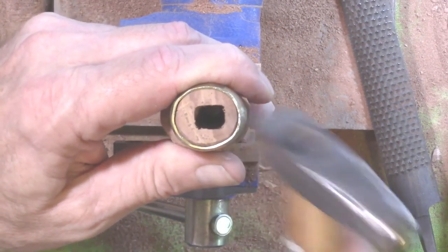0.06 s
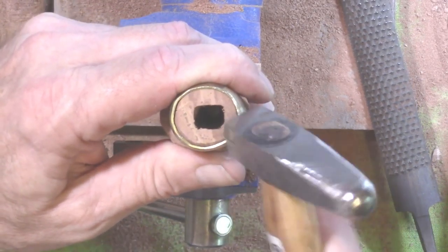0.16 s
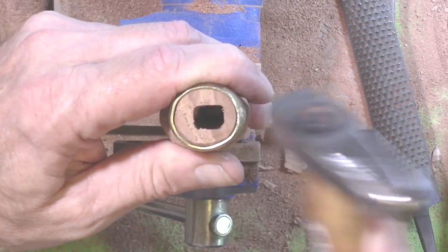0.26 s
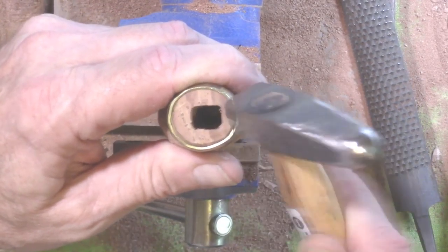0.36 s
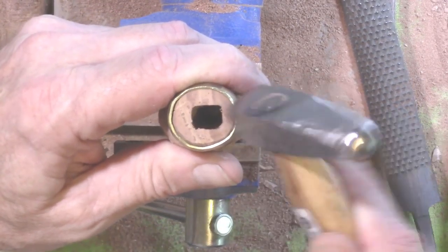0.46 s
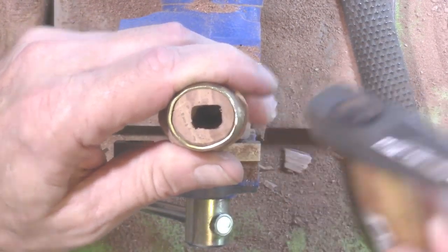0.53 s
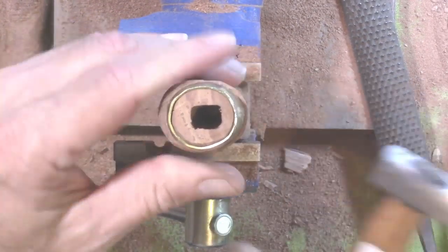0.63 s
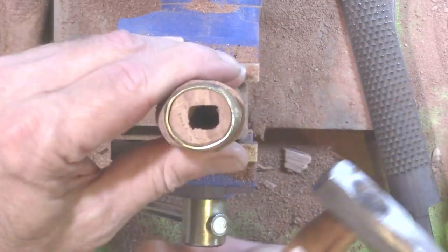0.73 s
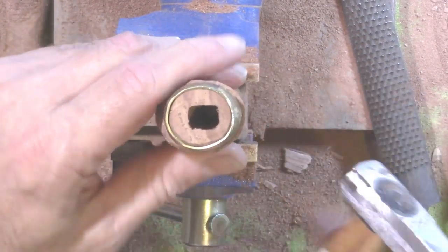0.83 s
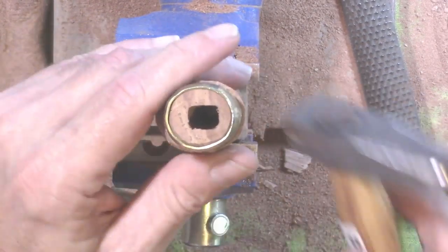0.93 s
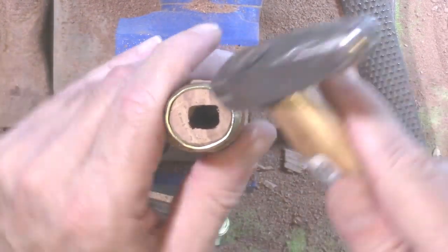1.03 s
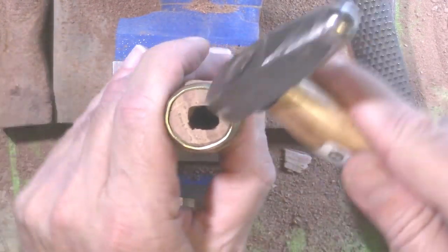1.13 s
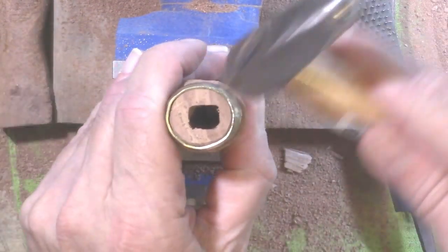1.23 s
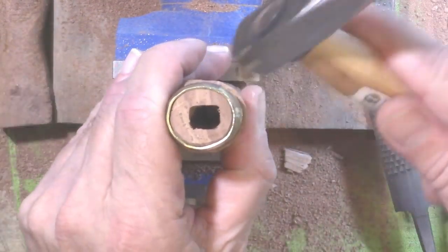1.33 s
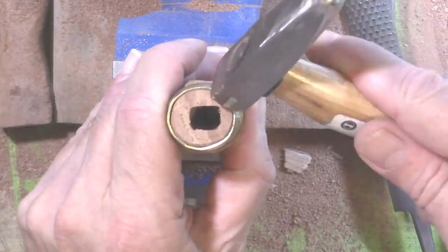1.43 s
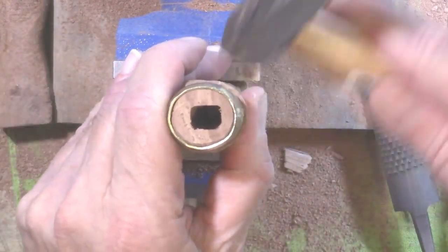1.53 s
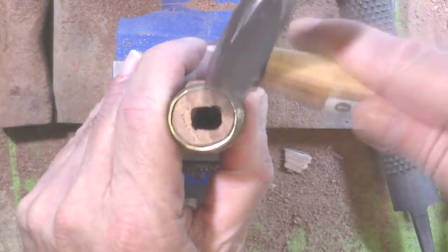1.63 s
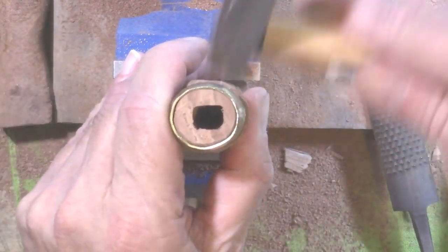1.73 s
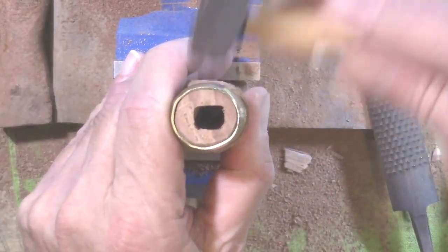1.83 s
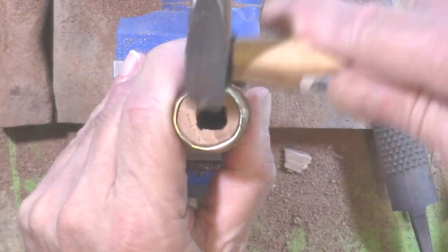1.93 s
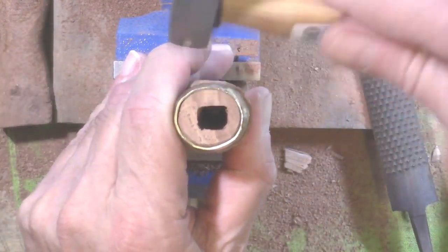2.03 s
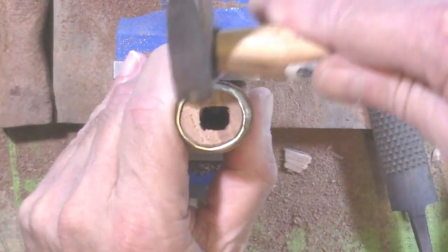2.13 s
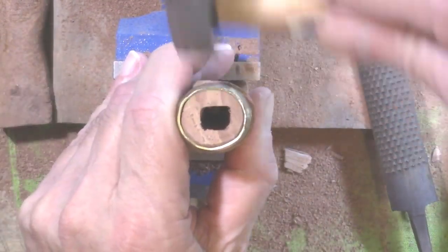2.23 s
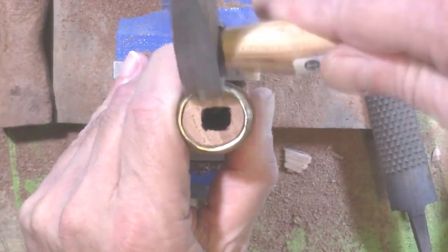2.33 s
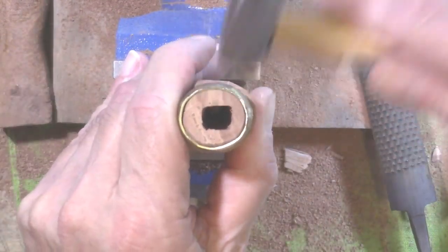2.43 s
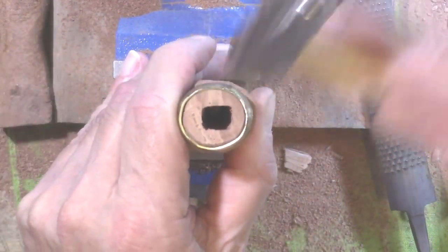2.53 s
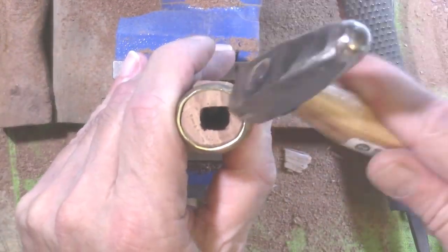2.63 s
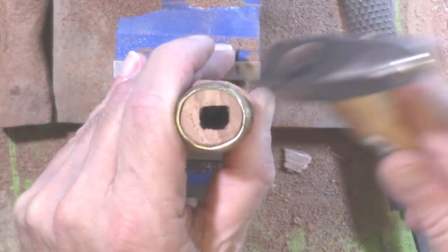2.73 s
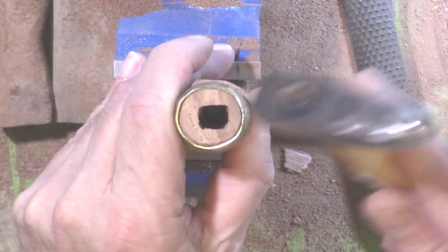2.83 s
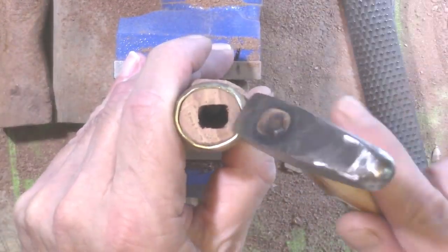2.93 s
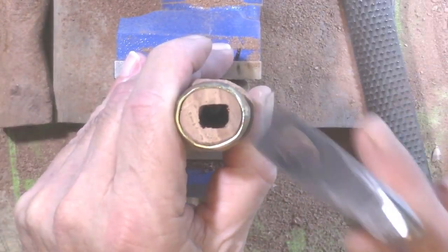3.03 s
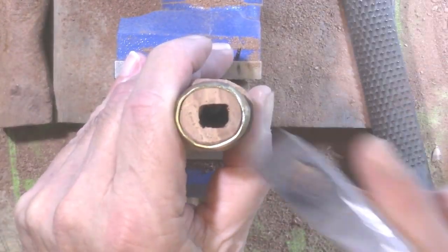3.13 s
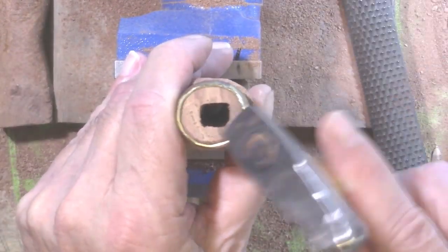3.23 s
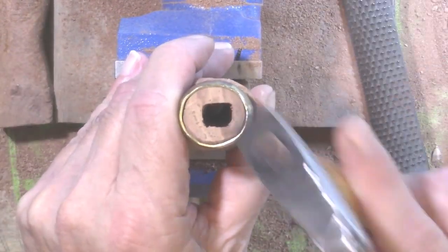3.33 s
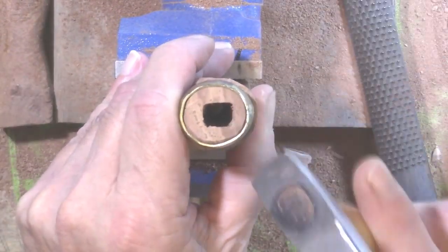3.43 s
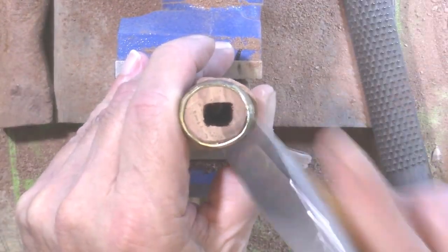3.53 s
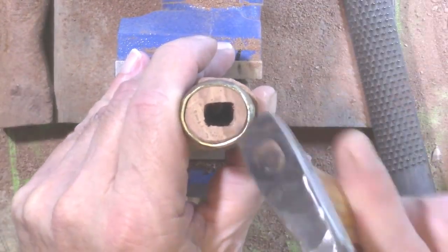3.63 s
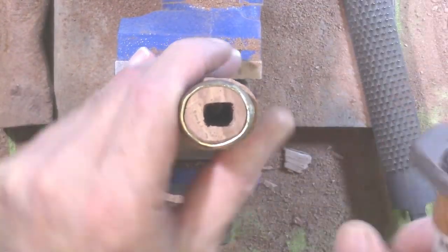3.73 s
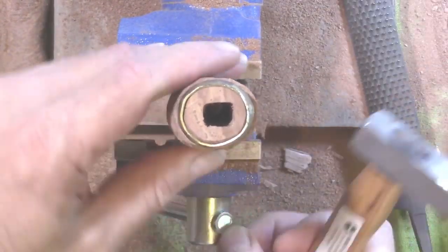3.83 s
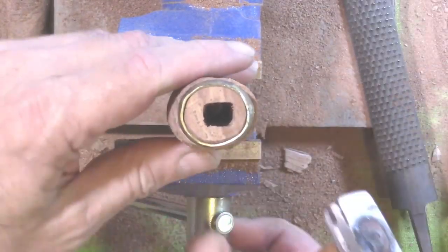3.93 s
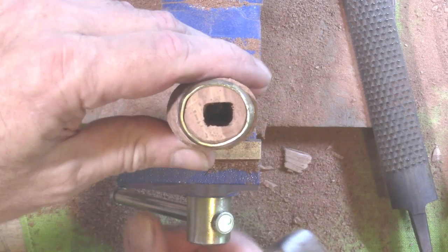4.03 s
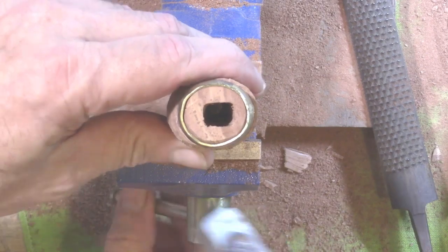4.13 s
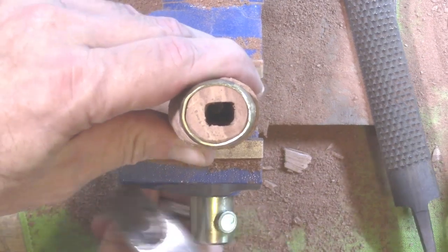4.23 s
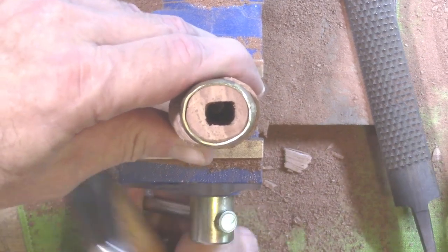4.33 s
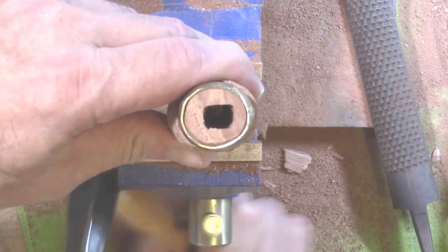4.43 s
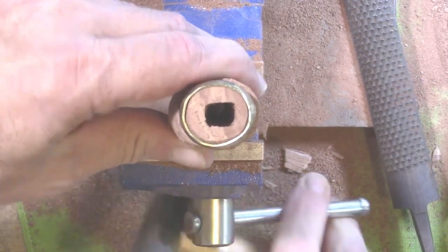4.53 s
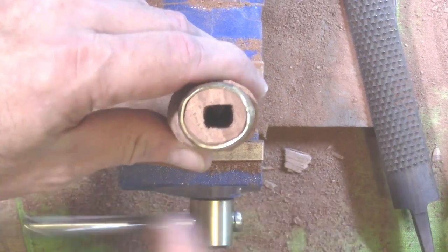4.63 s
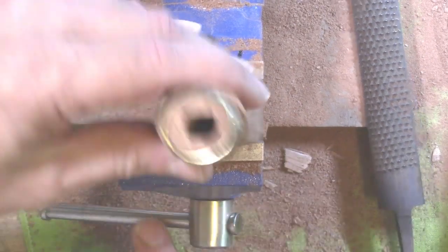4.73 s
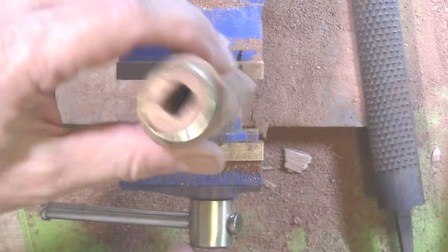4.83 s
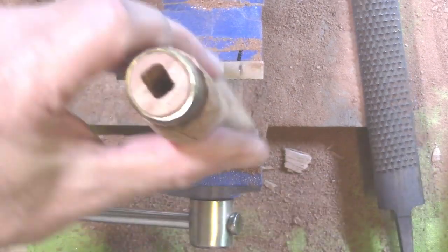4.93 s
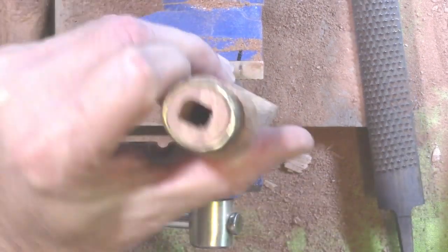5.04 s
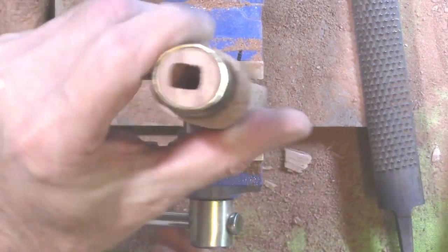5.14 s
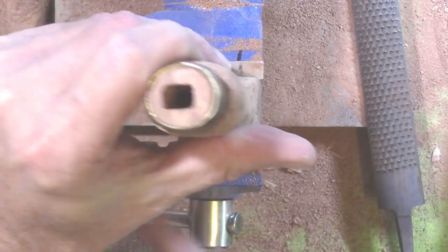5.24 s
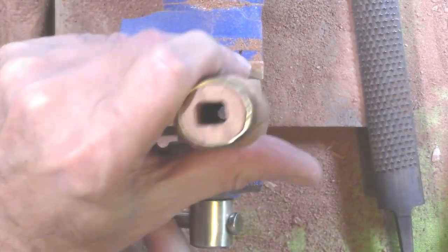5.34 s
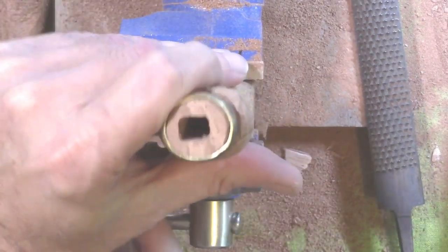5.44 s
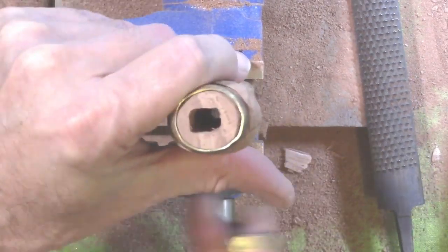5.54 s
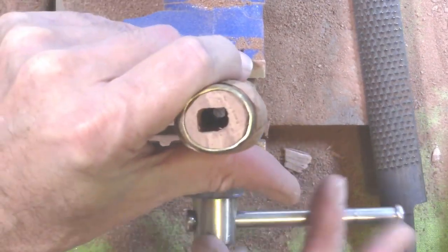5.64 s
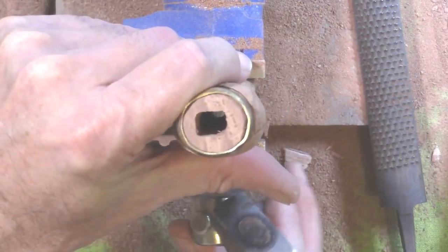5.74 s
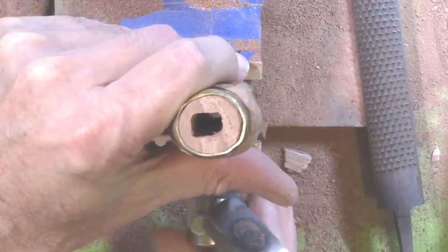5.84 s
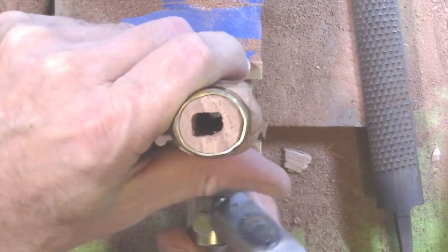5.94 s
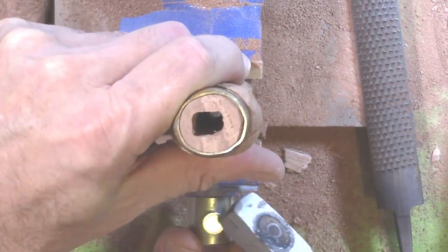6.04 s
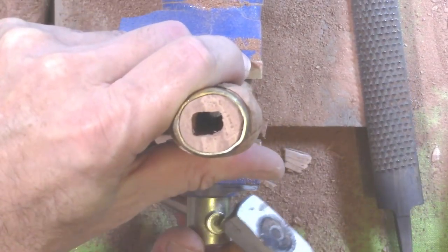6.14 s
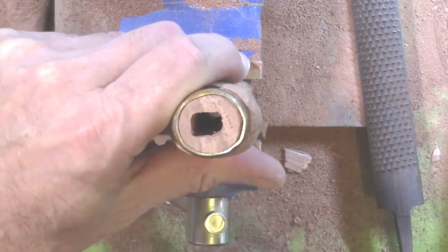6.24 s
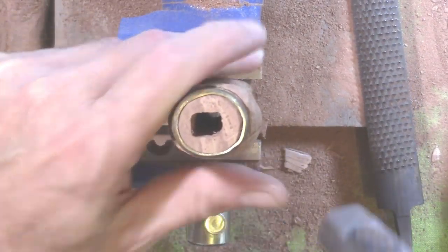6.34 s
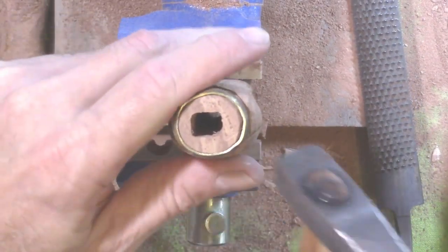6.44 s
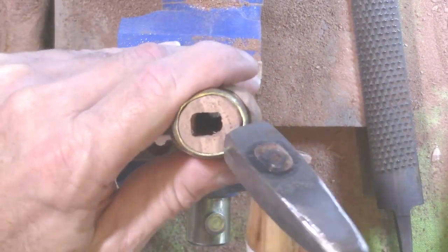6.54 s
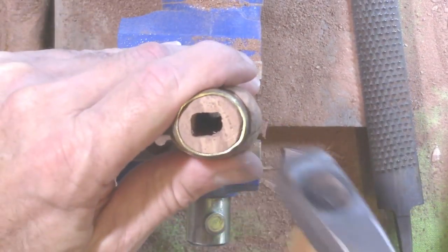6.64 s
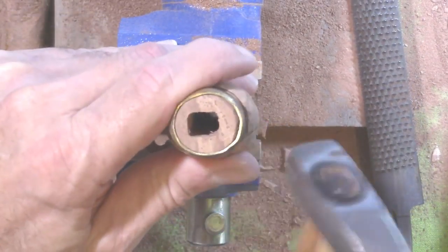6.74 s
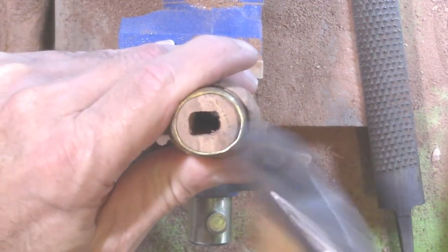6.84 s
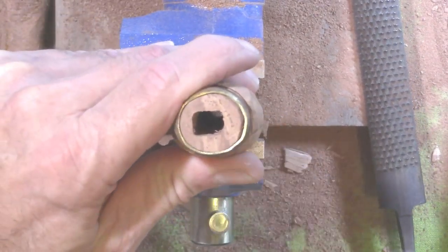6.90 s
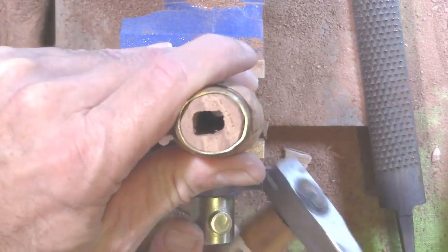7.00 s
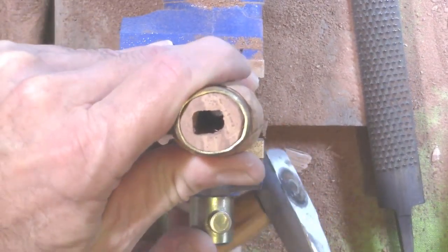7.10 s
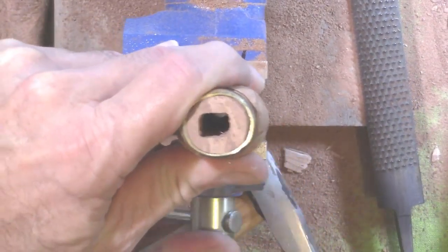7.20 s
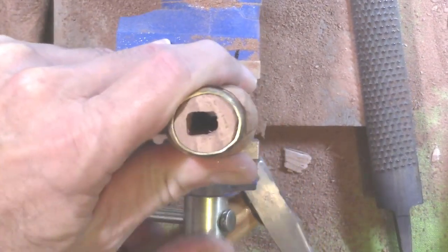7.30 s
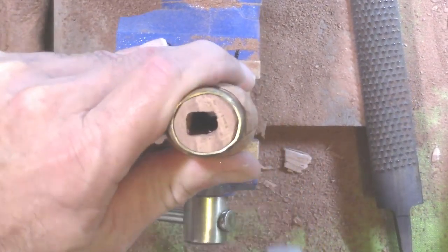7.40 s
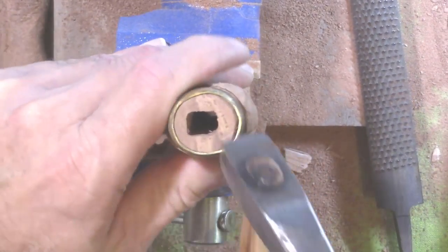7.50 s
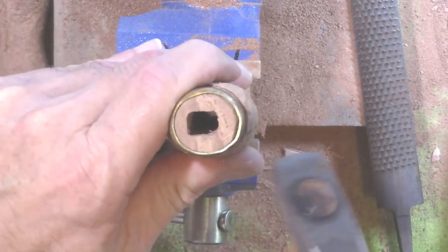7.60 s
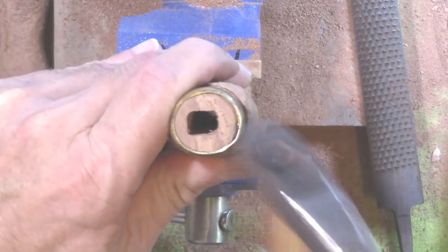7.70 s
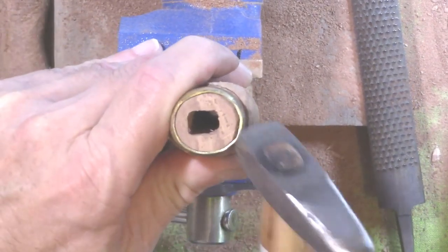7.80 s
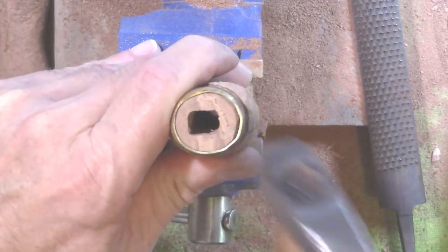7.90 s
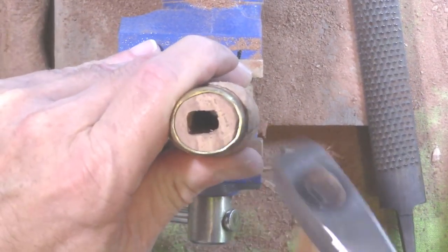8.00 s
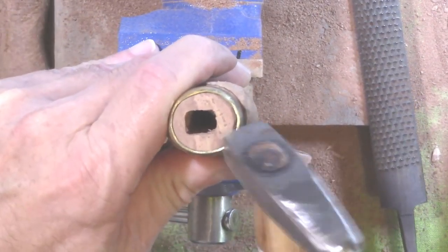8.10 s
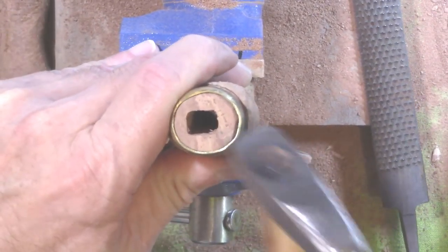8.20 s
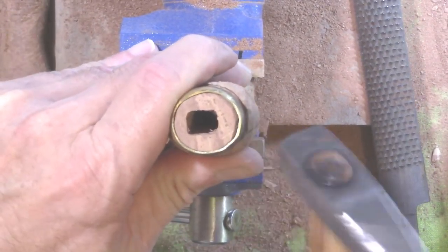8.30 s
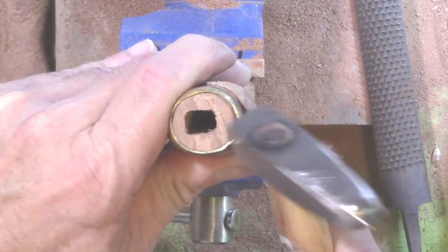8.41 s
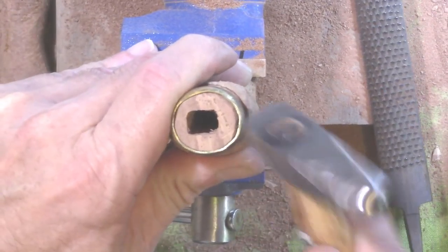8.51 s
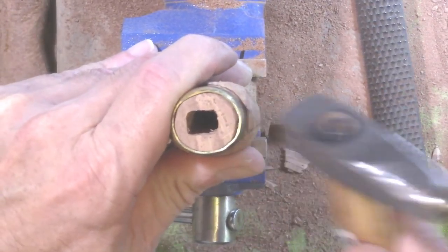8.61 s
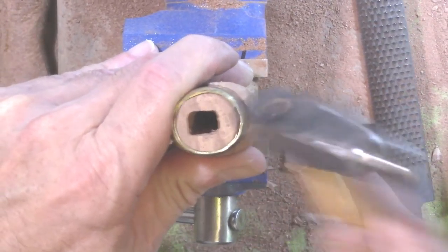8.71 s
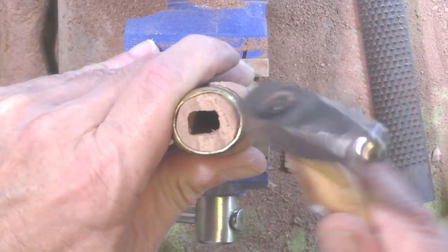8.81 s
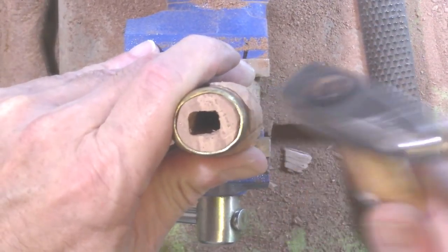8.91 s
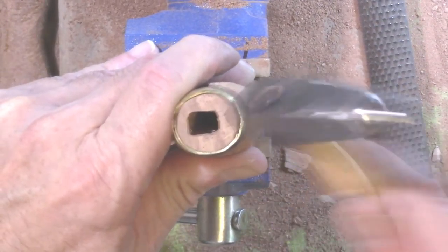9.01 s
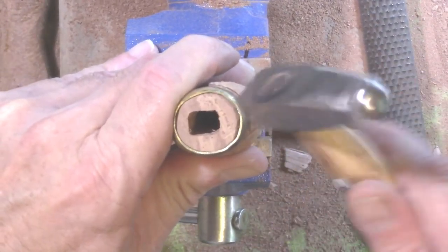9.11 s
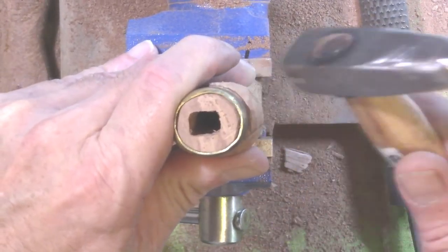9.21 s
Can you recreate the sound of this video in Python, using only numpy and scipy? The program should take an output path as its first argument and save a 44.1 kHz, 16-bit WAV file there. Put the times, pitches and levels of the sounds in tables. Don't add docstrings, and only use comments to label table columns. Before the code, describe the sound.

Fast, crisp hammer taps on brass and wood, a short burst then a long steady run, with a faint ringing vise beneath. The tapping stops for quieter handling: bright bar clinks, jaw knocks, soft thuds, brief slides and loose grit. A few taps, more clinking, then another steady run to the end. Close, dry, nearly mono microphone with slight reflections from nearby walls.

```python
import sys
import numpy as np
from scipy import signal
from scipy.io import wavfile
from scipy.ndimage import uniform_filter1d

SR = 44100
rng = np.random.default_rng(int(sys.argv[2]) if len(sys.argv) > 2 else 0)


def to_wav(s):
    ch = np.atleast_2d(s).T
    pcm = np.round(np.clip(ch, -1, 1) * 32767)
    wavfile.write(sys.argv[1], SR, pcm.astype(np.int16))


def makeup_ratio(level_db):
    decades = np.asarray(level_db, float) / 20
    return 10 ** decades


N = 408366

RISE_SAMPLES = 20


def at_hz(points, hz, column=1):
    table = np.array(points)
    return np.interp(np.log(hz), np.log(table[:, 0]), table[:, column])


def fade(x, t60_s):
    return signal.lfilter([1], [1, -makeup_ratio(-60 / (t60_s * SR))], x + 1e-18)


def ring(force, hz, t60_s):
    r, w = makeup_ratio(-60 / (t60_s * SR)), 2 * np.pi * hz / SR
    return signal.lfilter([0, np.sin(w)], [1, -2 * r * np.cos(w), r * r], force + 1e-18)


def filtered(x, order, hz, kind):
    return signal.sosfilt(signal.butter(order, hz, kind, fs=SR, output="sos"), x)


def clicks_at(start_s, height):
    clicks = np.zeros(N)
    clicks[np.round(start_s * SR).astype(int)] = height
    return clicks


def in_order(*tables):
    rows = np.concatenate(tables)
    return rows[np.argsort(rows[:, 0])]


def aim(s, column):
    # start_s, angle_deg (round the ring), chatter_ms, edge_db (sharpness)
    aim_path = np.array([(0, -4, 6.2, -3), (.25, 4, 8.1, -1.5), (.5, 3, 13, -3.5), (1.15, 39, 4.2, -5.5),
                         (1.6, 67, 6.1, -4), (2.0, 85, 3.1, -5.5), (2.4, 100, 6.8, -5), (2.62, 65, 6.3, 0),
                         (2.8, 4, 5.5, -4), (3.2, -21, 2.4, -2.5), (3.65, -47, 9, -4.5),
                         (6.7, -10, 0.95, -5), (7.65, -33, 2.6, -5.5), (8.1, -28, 0.87, -7),
                         (8.52, -28, 4.4, -4), (8.57, 26, 3.4, -4), (9.26, 33, 1.18, -2)])
    return np.interp(s, aim_path[:, 0], aim_path[:, column])


def lobes(s, per_turn, at_deg):
    return np.cos(np.radians(per_turn * (aim(s, column=1) - at_deg)))


def place_db(s, strongest_deg=None, anew_db=0):
    swing_db, lobes_per_turn, clamped_anew_s = 5, 2.17, 5.0
    if strongest_deg is None:
        return 0
    return swing_db * lobes(s, lobes_per_turn, strongest_deg) + anew_db * (s > clamped_anew_s)


def spot_db(rows, hz):
    # centre_hz, mean_db, swing_db, lobes_per_turn, strongest_deg
    families = [(550, 0, 6, 1.5, 85), (1050, 3, 9, 2.2, 85), (1800, 1, 3, 1.5, 60), (4250, -3, 6.5, 2.6, 0)]
    return sum((db + swing_db * lobes(rows[:, 0], turns, deg)) * np.exp(-(np.log(hz / centre) / 0.22) ** 2)
               for centre, db, swing_db, turns, deg in families)


def share_db(rows, hz):
    place = np.interp(np.log(hz), np.log([800, 2000, 4500, 9000]), [-1, 0, 0, 1])
    return rows[:, 2] * max(-place, 0) + rows[:, 3] * max(place, 0)


def contacts(rows):
    start = np.round(rows[:, 0] * SR).astype(int)
    which = np.clip(np.searchsorted(start, np.arange(N), side="right") - 1, 0, None)
    since = np.arange(N) - start[which]
    hold = np.clip(rows[which, 4], .2, 30) * SR / 1000
    press = np.clip(since / RISE_SAMPLES, 0, 1) * np.exp(-(since / hold) ** 2) / np.sqrt(hold)
    return which, press, since


def repeating_noise(since, size):
    fresh, walk_turns_per_s = .2, .3
    one, other = rng.standard_normal((2, *size, SR))[..., since % SR]
    turn = 2 * np.pi * walk_turns_per_s * (np.arange(N) - since) / SR
    alike = np.cos(turn) * one + np.sin(turn) * other
    return np.sqrt(1 - fresh) * alike + np.sqrt(fresh) * rng.standard_normal((*size, N))


def struck_modes(rows, modes, level_db, spread_db=1.0, chatter=0.35, click=0.12):
    which, press, since = contacts(rows)
    luck = rng.standard_normal((len(rows), len(modes)))
    force = chatter * press * repeating_noise(since, size=()) - click * (since == RISE_SAMPLES)
    out = np.zeros(N)
    for k, (hz, db, t60_s, *place) in enumerate(modes):
        gain_db = rows[:, 1] + level_db + db + share_db(rows, hz)
        gain_db = gain_db + place_db(rows[:, 0], *place) + spread_db * luck[:, k]
        out += ring(force * makeup_ratio(gain_db)[which], hz, t60_s)
    return out


def noisy_parts(rows):
    # pitch_hz, level_db, fall_s (power down 10^3)
    crack_modes = [(59.7, -45.5, 0.05), (155, -41, 0.11), (324, -27.5, 0.38), (720, -12, 0.18),
                   (1220, -10, 0.094), (2170, -8, 0.039), (5000, -5.5, 0.036), (6800, -10, 0.029),
                   (10170, 2.5, 0.034), (11340, -5, 0.028), (15500, -12, 0.019)]
    # pitch_hz, level_db (re blow), fall_s (power down 10^3)
    walls = [(150, -24, .3), (477, -4.5, 0.15), (1600, -21, 0.22), (4000, -19, 0.077), (12000, -42.5, 0.15)]
    # start_s, level_db
    hands = [(0.0, -41.5), (0.5, -53), (1.0, -59.5), (1.37, -48.5), (3.02, -57.5), (3.53, -48.5),
             (3.87, -58.5), (4.329, -56.5), (4.62, -58), (4.77, -60.5), (5.47, -57), (5.72, -61),
             (6.439, -54.5), (6.52, -62), (7.3, -53.5), (7.601, -62.5), (8.228, -52.5), (9.26, -49)]
    # pitch_hz, level_db_per_hz
    hush = [(24, -55), (40, -16), (148, -22), (239, 4), (396, -4.5), (449, 1), (510, 4), (6830, -10.5),
            (14500, -18), (16500, -29)]
    # pitch_hz, side_minus_mid_db
    width = [(60, -19.5), (110, -24.5), (200, -26), (380, -30.5), (700, -25), (1290, -39), (2380, -23),
             (8120, -21.5)]
    hush_db, patch_db, side_patch_db = -76.5, 2, 5
    knock_decay_share = .7
    bands_hz = 40 * 2 ** np.arange(0, 8.9, 1 / 2)

    which, press, since = contacts(rows)
    rustle = makeup_ratio(np.interp(np.arange(N) / SR, *np.transpose(hands)) + 15.0)
    grains = (rng.random(N) < 700 / SR) * rng.exponential(1, N)
    grit = fade(grains, 0.017) + 1.6
    luck = rng.standard_normal((len(rows), len(bands_hz)))
    white, out = repeating_noise(since, size=(2, 2)), 0
    is_knock = rows[:, 5] > 0
    light = is_knock[which]
    for k, (low, high) in enumerate(zip(bands_hz, bands_hz[1:])):
        hz = np.sqrt(low * high)
        near_pitch = np.exp(-(np.log(hz / np.abs(rows[:, 5])) / 0.33) ** 2)
        own_db = is_knock * (9 * near_pitch - 7 - 5 * (hz > 11000))
        own_db = own_db + patch_db * luck[:, k] + 0.16 * spot_db(rows, hz)
        blow_db = rows[:, 1] + share_db(rows, hz) + own_db + at_hz(crack_modes, hz)
        energy = (press ** 2 + .5 * (since == RISE_SAMPLES)) * makeup_ratio(2 * blow_db)[which]
        fall_s = at_hz(crack_modes, hz, column=2)
        crack = fade(energy * ~light, fall_s) + fade(energy * light, fall_s * knock_decay_share)
        spread = uniform_filter1d(energy, size=401, origin=200)
        wash = makeup_ratio(2 * at_hz(walls, hz)) * fade(spread, at_hz(walls, hz, column=2))
        slide = grit * (makeup_ratio(at_hz(crack_modes, hz)) * slide_level(hz)) ** 2
        steady = makeup_ratio(2 * at_hz(hush, hz)) * (makeup_ratio(2 * hush_db) + rustle ** 2)
        per_band = SR / 2 / (high - low)
        level = np.sqrt(per_band * (crack + wash + slide) + steady)
        mid, side = filtered(level * white[k % 2], 2, [low, high], "band")
        uneven_db = np.minimum(at_hz(width, hz) + side_patch_db * luck[::-1, k], -10)
        out = out + mid + makeup_ratio(uneven_db)[which] * side * [[1], [-1]]
    return out


def tap_contacts():
    # start_s, peak_db, vise_share_db
    round_a = [(0.0285, -4.2, -11), (0.1007, -6, -12), (0.1746, -5, -15), (0.2475, -4.5, -15.5),
               (0.3187, -4.5, -16.5), (0.3902, -6, -15.5), (0.4673, -5, -18)]
    round_b = [(1.146, -11.5, -18.5), (1.2305, -5.5, -12), (1.305, -4, -11), (1.3767, -5.5, -13),
               (1.449, -5, -9.5), (1.518, -5.5, -10), (1.5905, -6, -8.5), (1.6608, -5, -7.5),
               (1.7325, -4.5, -6), (1.7997, -3.8, -11), (1.87, -4, -10), (1.9419, -3.5, -15.5),
               (2.01, -4, -19), (2.078, -3.5, -16.5), (2.1475, -4, -12), (2.219, -4, -16.5),
               (2.2893, -3.5, -14.5), (2.3595, -4.0, -17.5), (2.4287, -3.5, -27), (2.4985, -4.5, -11.5),
               (2.5681, -6, -16), (2.6456, -6, -9.5)]
    round_b_side = [(2.7224, -6, -16), (2.799, -5, -21.5), (2.8724, -6.5, -22.5), (2.9468, -5.5, -15.5),
                    (3.0212, -5.5, -22), (3.096, -5.0, -16), (3.1763, -5.0, -13), (3.255, -5, -14),
                    (3.3354, -4.5, -13), (3.411, -4, -11.5), (3.4887, -5, -9.5), (3.5645, -4, -8.5),
                    (3.6424, -5.5, -5)]
    round_c = [(6.7008, -3.5, -15.5), (6.789, -8, -16), (6.868, -6, -10)]
    round_d = [(7.6543, -4.5, -10.5), (7.7354, -5.5, -14), (7.8138, -5, -13), (7.891, -3.5, -9),
               (7.968, -4, -9), (8.0472, -3, -10.5), (8.1239, -3.5, -9), (8.2032, -2.5, -9),
               (8.28, -3, -13), (8.3528, -4, -9.5), (8.4305, -5, -7.5), (8.5068, -4.8, -10),
               (8.5838, -5, -12), (8.66, -5, -9), (8.7354, -5.5, -14), (8.8108, -4.5, -14.5),
               (8.8872, -5, -17), (8.9612, -5, -26), (9.0352, -4.5, -13), (9.1074, -4, -15),
               (9.1812, -3, -24)]
    last_tap = [
        (9.2555, -6.5, -28),
    ]
    bass_db, bass_swing_db, bass_lobes, thinnest_deg = -12, 2.5, 2.5, 28.5
    peak_over_force_db, scatter_db, chatter_scatter = 3, 0.5, 0.053

    s, db, vise_db = in_order(round_a, round_b, round_b_side, round_c, round_d, last_tap).T
    low, high, hold = rng.standard_normal((len(s), 3)).T
    bass = bass_db - bass_swing_db * lobes(s, bass_lobes, thinnest_deg) + scatter_db * low
    treble = aim(s, column=3) + scatter_db * high
    chatter_ms = aim(s, column=2) * np.exp(chatter_scatter * hold)
    return np.transpose([s, db - peak_over_force_db, bass, treble, chatter_ms, np.minimum(vise_db, -1)])


def snap(rows, level_db=22.5, edge_db=-13.5, hz=4600, edge_hz=10200):
    clicks = clicks_at(rows[:, 0], -makeup_ratio(rows[:, 1] + rows[:, 3] / 2 + level_db))
    dip = filtered(np.roll(clicks, RISE_SAMPLES), 2, [hz / 2, hz * 2.07], "band")
    return dip + makeup_ratio(edge_db) * ring(clicks, edge_hz, 0.0054) / 2


def handle_and_brass(taps):
    # pitch_hz, level_db, t60_s, strongest_deg, clamped_anew_db
    handle = [(411, -10, .2, 0, 0), (532, 1, .12, 80, 0), (672, 6, .1, 70, 2), (785, -3, .1, -30, 0),
              (1011, 10, .08, 85, -1), (1065, 0, .09, 60, 5), (1255, 0, .1, 75, -5), (1440, 0, .09, -40, 1),
              (1590, -1, .07, 80, -4), (1695, 6, .09, 55, -1), (1797, 8, .06, 55, 1), (1843, 8, .1, 40, 2)]
    # pitch_hz, level_db, t60_s, strongest_deg, clamped_anew_db
    brass = [(2097, -6.5, .08, 7.5, 1), (2258, -2.5, 0.1, 83, 8.5), (2514, -6.5, 0.046, 8, 11.5),
             (2680, -0.5, 0.097, 47, 7), (2798, -1, 0.068, -50.5, -4), (3165, 2.5, 0.055, 53, -3),
             (3630, -0.5, 0.1, 44, -11), (3900, -11, .05, -10.5, -18), (4165, 5, .035, 10, 1),
             (4250, 4, .035, -15, -3), (4460, -9.5, .06, 29, 7), (4963, 5, 0.052, -36.5, -2.5),
             (5120, -2.5, 0.045, 41, 4), (8090, 6.5, .015, 59, -7.5)]
    return struck_modes(taps, handle + brass, level_db=-4.5, spread_db=3.0)


def vise_ring(taps):
    # pitch_hz, level_db, t60_s
    vise = [(704.2, 0, 0.51), (690.7, -7, 0.5), (708, -15, 0.22), (1824, -5, 0.27), (1710, -13.5, 0.26),
            (1490, -16, 0.44), (1270, -16, 0.35), (414.2, -11.5, 0.45), (1067, -13.5, 0.41),
            (985, -17, 0.59), (585, -18.5, 0.45), (2070, -12.5, .15), (1890, -13, 0.23)]
    push = fade(clicks_at(taps[:, 0], makeup_ratio(taps[:, 1] + taps[:, 5])), 0.00037)
    return sum(makeup_ratio(db) * ring(push, hz, t60_s) for hz, db, t60_s in vise) / 6


def echoed(x, dull_hz=3500, thin_hz=330):
    # delay_s, level_db
    echoes = [
        (.0045, -35),
        (.0095, -5.5),
    ]
    x = filtered(x, 2, thin_hz, "high")
    dull = filtered(x, 1, dull_hz, "low")
    return x + sum(makeup_ratio(db) * np.interp(np.arange(N) - s * SR, np.arange(N), dull) for s, db in echoes)


def thuds():
    # start_s, peak_db, pitch_hz, t60_s
    bumps = [(0.58, -35, 466, .04), (.7595, -31, 1900, .012), (.7772, -20, 2300, 0.014),
             (.781, -23, 610, 0.023), (.866, -46, 1700, .025), (.942, -30, 880, 0.038),
             (0.999, -16, 1410, .03), (1.001, -21, 1730, .015), (1.025, -23, 1455, .03),
             (1.027, -19, 252, 0.033), (1.09, -41, 1720, .02), (4.531, -22, 1910, 0.039),
             (4.919, -28, 1125, .03), (5.131, -23, 1500, 0.016), (5.349, -27, 1800, 0.027),
             (5.742, -27, 1800, 0.03), (6.22, -30, 950, .03), (6.281, -35, 224, .04),
             (6.283, -29, 680, .04), (6.411, -30, 800, 0.027), (6.47, -35, 1800, .015),
             (6.484, -38, 1800, .015)]
    out, after = np.zeros(N), np.arange(4000)
    for s, db, hz, t60_s in bumps:
        soft = ring(ring(after == 0, hz, t60_s), hz, t60_s)
        out[round(s * SR) + after] += makeup_ratio(db) * soft / (t60_s * 2500)
    return out


def knock_contacts(*tables):
    contact_ms, short_above_hz = 2.1, 3400
    s, db, bass, treble, hz = in_order(*tables).T
    return np.transpose([s, db, bass, treble, contact_ms * np.minimum(1, short_above_hz / hz), hz])


def dull_knocks():
    # start_s, peak_db, bass_share_db, treble_share_db, clink_hz
    opening = [(0.5969, -29, -16, -9, 1290), (0.648, -24.5, -12, -10, 1550), (0.7597, -37, 3, -26, 1920),
               (0.7764, -27.5, -1, -9, 2300), (0.9994, -23, 8, -24, 1464), (4.1066, -15.5, 0.5, -8, 2000),
               (4.2375, -24, -13, -4, 4480), (4.2455, -15.5, -18, -5, 2650), (4.2525, -18, -11, -8, 2650),
               (4.261, -23, -7, -6, 4450), (4.3176, -21, -9, -4, 4230), (4.441, -39, 4, -6, 636),
               (4.5005, -36, 6, -14, 2140), (4.766, -30, -3, -22, 3650), (4.9177, -28, 3, -36, 1780),
               (4.9762, -31.5, -0.5, -17, 1275), (5.1294, -26, -8, -19, 1080),
               (5.1937, -31.5, 2, -12, 1830), (5.244, -36.5, -24, -15, 4230), (5.2694, -39, -16, -17, 705),
               (5.438, -35.5, -6, -4, 3520), (5.5068, -35.5, 7, -13, 1840), (5.5524, -36, 7, 0, 1830),
               (5.5703, -32.5, -8, -9, 4170)]
    # start_s, peak_db, bass_share_db, treble_share_db, clink_hz
    tightening = [(5.8441, -30, -2, -14, 3980), (5.986, -39.5, 7.5, -21, 1090),
                  (6.0335, -32.5, -11, -9, 1000), (6.2048, -30.5, 5, -5, 4750), (6.277, -28, 4.5, -3, 830),
                  (6.3042, -26.5, -24, -9, 765), (6.408, -22.5, -10.5, -9, 790), (6.472, -33, 4, -28, 1870),
                  (6.483, -35, -29, -1, 1870), (6.5174, -14, -6.5, -12, 890),
                  (7.0216, -18, -18, -2.5, 1890), (7.0449, -24, -2, -14, 1890),
                  (7.1395, -25.5, -0.5, -2.5, 4950), (7.229, -38, -7, -27, 3900), (7.298, -29, -7, 0, 4500),
                  (7.3429, -20.5, -9, -7, 3020), (7.3556, -25, -5, 5, 4100), (7.379, -27.5, -16, -6, 1210),
                  (7.4171, -29.5, -8, -9, 1020)]
    # start_s, peak_db, bass_share_db, treble_share_db, clink_hz
    rattle = [
        (4.5709, -39, -10, -8, 3180),
        (4.6342, -38, -10, -8, 4040),
        (4.6342, -31, -10, -8, 2500),
        (4.6691, -13, -10, -8, 2660),
        (4.7694, -35, -10, -8, 3590),
    ]
    loose = [(s, db - 6, *rest) for s, db, *rest in rattle if abs(s - 4.668) > .006]
    return knock_contacts(opening, tightening, loose)


def bright_clinks():
    # start_s, peak_db, bass_share_db, treble_share_db, clink_hz
    bar_clinks = [(0.799, -54, -14, 18, 5240), (1.024, -17, -10, -5, 6100), (4.2268, -10, -22, -3, 4450),
                  (4.4872, -41, -2, -21, 3580), (4.5288, -13, -7.5, -2, 5750), (4.5734, -32, 8, -21, 3180),
                  (4.6682, -11, -5.5, 1, 2820), (5.3476, -22.5, -2.5, -9.5, 7500),
                  (5.5894, -40.5, -4, 0, 3830), (5.6396, -43.5, 5, -5, 4120),
                  (5.7415, -19.5, -8, -16, 6800), (5.887, -13, -14, -7, 9040),
                  (5.9368, -15.5, -12, -15.5, 8900), (6.1645, -26.5, 0, -13, 5000),
                  (6.2204, -27, -5, -26, 5700), (7.071, -30.5, 2, -12, 3900), (7.1651, -32, -9, -4, 4140)]
    return knock_contacts(bar_clinks)


def jaw_ring(knocks):
    # pitch_hz, level_db, t60_s
    jaws = [(705, -19, .12), (1070, -10, 0.11), (1255, -18.5, 0.14), (1470, -9.5, 0.078),
            (1690, -12.5, 0.11), (1842, -5.5, .08), (2660, -15.5, 0.092)]
    return struck_modes(knocks, jaws, level_db=8.0)


def clinks(knocks, level_db=-4, t60_s=.025):
    out, after = np.zeros(N), np.arange(4000)
    for s, db, low, high, hold_ms, hz in knocks:
        span = np.clip(hold_ms, .2, 30) * SR / 1000
        chatter = rng.standard_normal(4000) * np.exp(-after / span) / np.sqrt(span)
        out[round(s * SR) + after] += makeup_ratio(db + level_db) * ring(chatter, hz, t60_s)
    return out


def grit_rattle(knocks, per_s=500, level_db=-1.0, after_db=-22, settle_s=0.4, t60_s=0.012):
    shaken = fade(clicks_at(knocks[:, 0], makeup_ratio(knocks[:, 1] + after_db)), settle_s)
    ticks = (rng.random(N) < per_s / SR) * rng.uniform(0.16, 1, N)
    ticks = ticks * (slide_level(3000) * makeup_ratio(level_db) + shaken)
    dealt = rng.integers(0, 10, N)
    return sum(ring(ticks * (dealt == k), hz, t60_s) * 3000 / hz
               for k, hz in enumerate(np.geomspace(1500, 7000, 10)))


def slide_level(hz):
    # start_s, length_s, level_db, bass_share_db, treble_share_db
    slides = [
        (0.91, 0.068, -33.5, 0, -7.5),
        (1.073, .04, -59, -16, 1),
        (4.512, 0.018, -40.5, 6, -9),
        (4.611, 0.061, -38.5, 0, -7),
        (6.374, 0.064, -41, -11, -7),
        (7.011, 0.02, -28.5, -10, -7.5),
        (4.654, 0.12, -43, 6, -11),
    ]
    rows = np.array([(s, db, low, high) for s, length_s, db, low, high in slides])
    level = np.zeros(N)
    for (s, length_s, *_), db in zip(slides, rows[:, 1] + share_db(rows, hz)):
        start, bump = round(s * SR), np.hanning(round(length_s * SR))
        level[start:start + len(bump)] += makeup_ratio(db) * bump
    return level


def bar_ring(knocks):
    # pitch_hz, level_db, t60_s
    bar = [(1765, -15, 0.14), (2660, 1, 0.13), (2730, -7, 0.1), (3900, -7, .07), (4320, -4, 0.071),
           (4550, -3, 0.097), (6500, -7, 0.065), (6250, -10, 0.046), (7900, -4, 0.063), (8300, -10, 0.073),
           (9330, -11, .05), (9970, -18, 0.061)]
    near_pitch = (knocks[:, 5] > 2600) & (knocks[:, 5] < 4600)
    steel = knocks[near_pitch & (knocks[:, 1] > -29)]
    steel[:, 1] -= .25 * np.clip(steel[:, 2], -22, 5)
    steel[:, 3] /= 2
    return struck_modes(steel, bar, level_db=0.0, spread_db=1.5)


def scene():
    taps, dull, bright = tap_contacts(), dull_knocks(), bright_clinks()
    knocks = in_order(dull, bright)
    snaps = snap(taps) + snap(bright, level_db=17.0) + snap(dull, level_db=13.0)
    direct = echoed(handle_and_brass(taps) + jaw_ring(knocks) + snaps)
    ringing = bar_ring(knocks) + vise_ring(taps) + clinks(knocks) + thuds() + grit_rattle(knocks)
    return direct + ringing + noisy_parts(in_order(taps, knocks))


def top_cut(x):
    return signal.sosfilt(signal.butter(12, 16940, fs=SR, output="sos"), x)


def record(dry):
    thin = filtered(dry, 1, 150, "high")
    rounded = 1.409 * np.tanh(thin / 3.32)
    cut = signal.sosfilt(signal.cheby2(8, 40, 17100, fs=SR, output="sos"), rounded)
    balance_db = [[.08], [-.08]]
    return top_cut(cut * makeup_ratio(balance_db))


dry = scene()
out = record(dry)
to_wav(out)
```